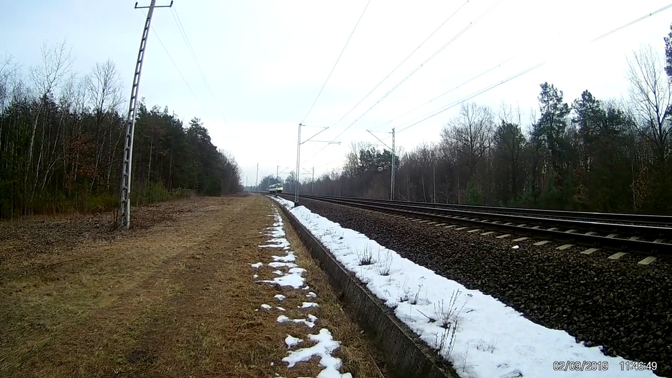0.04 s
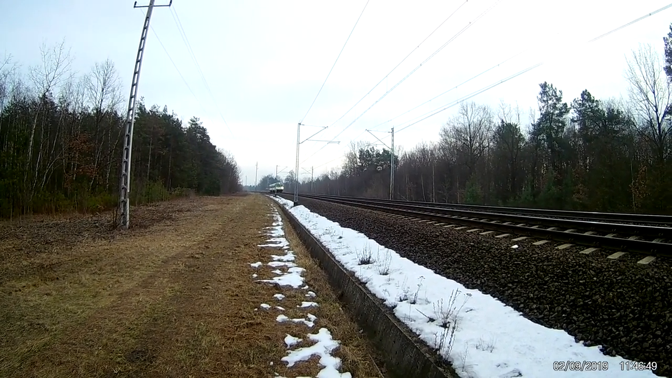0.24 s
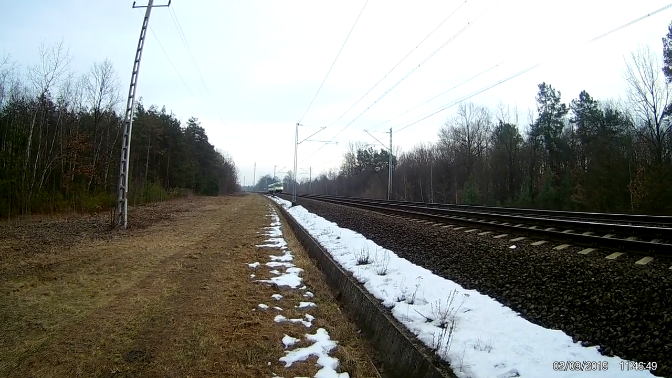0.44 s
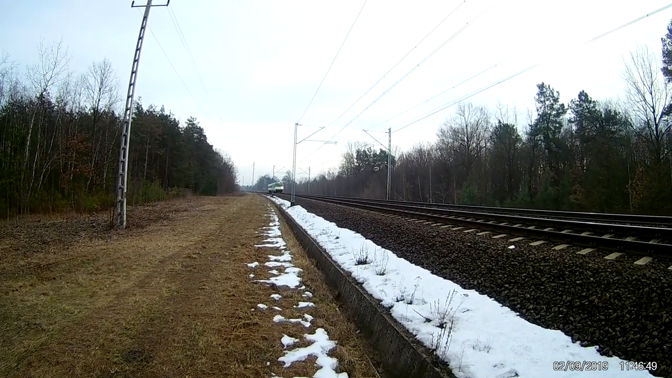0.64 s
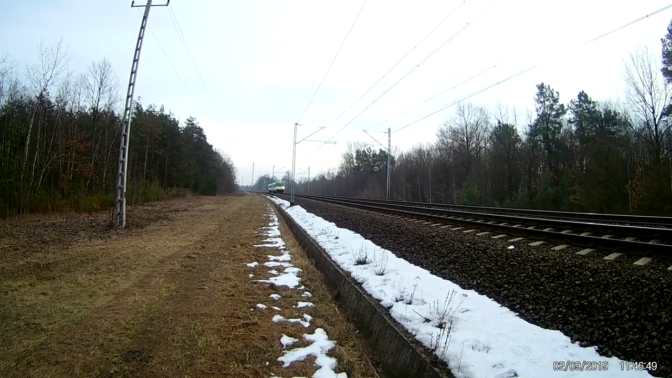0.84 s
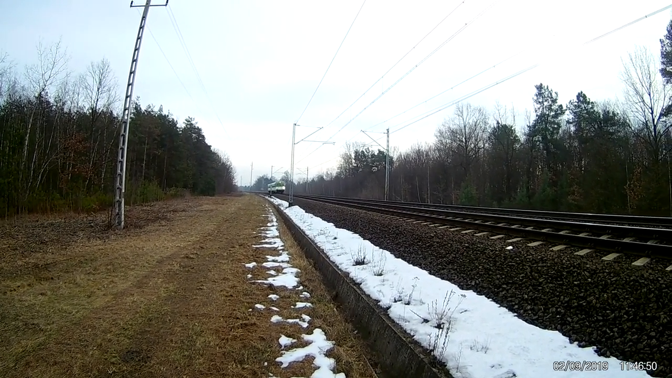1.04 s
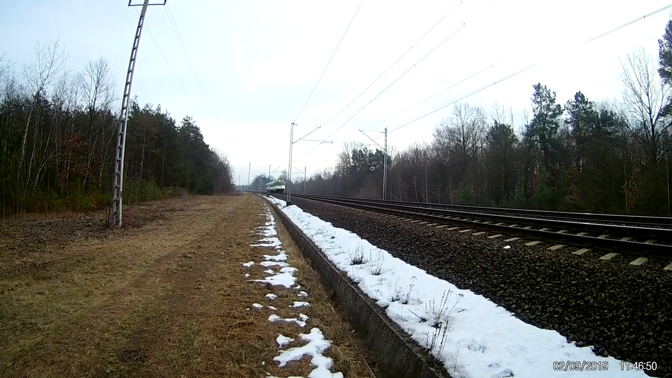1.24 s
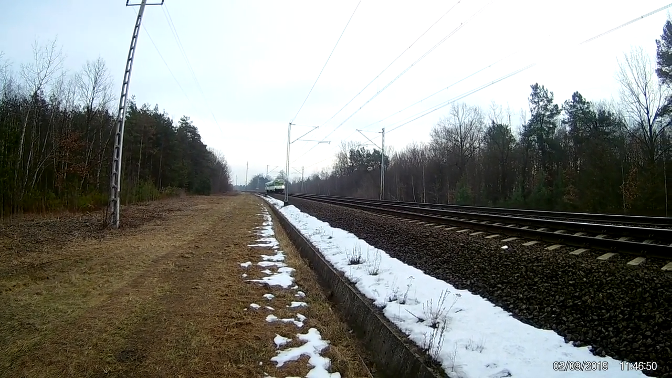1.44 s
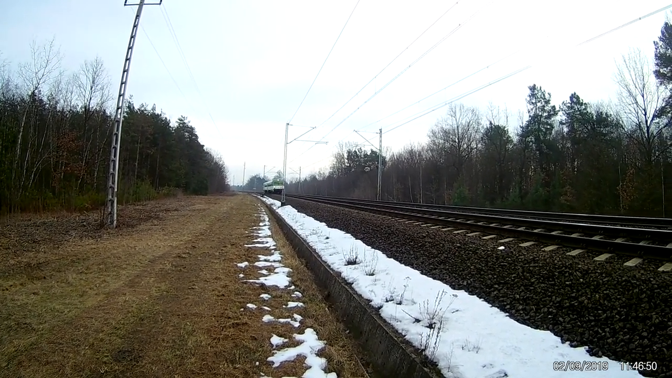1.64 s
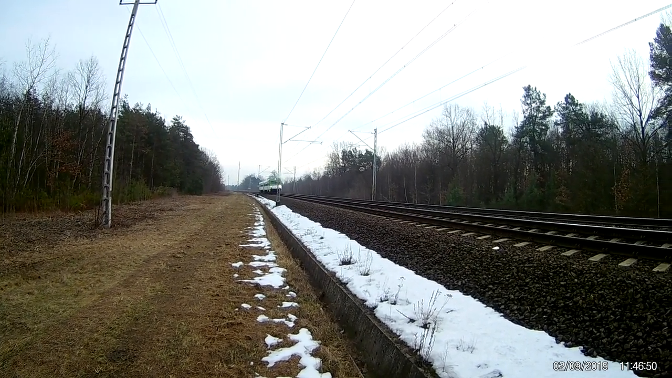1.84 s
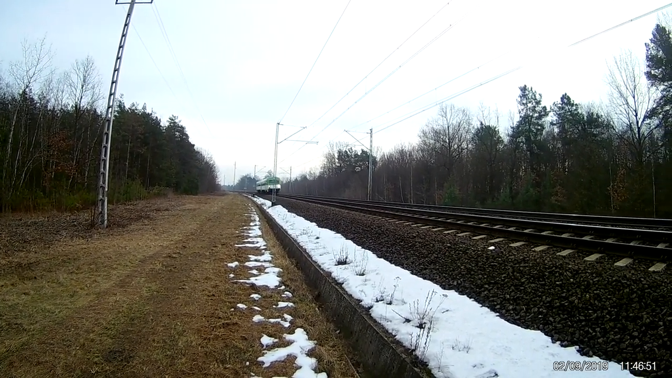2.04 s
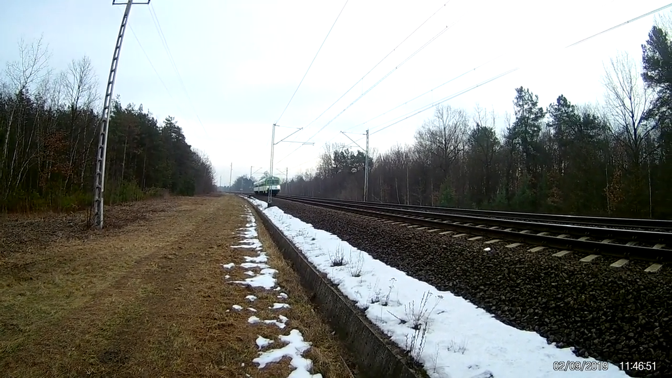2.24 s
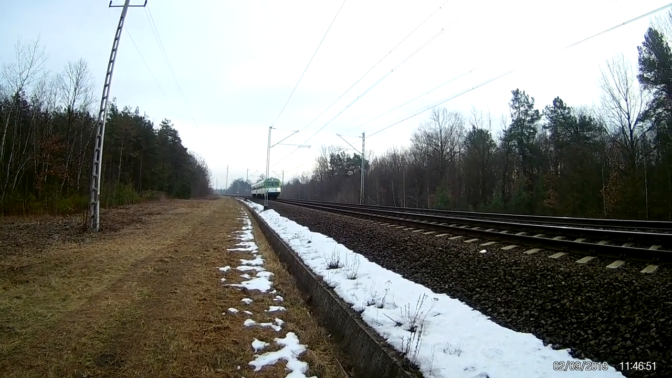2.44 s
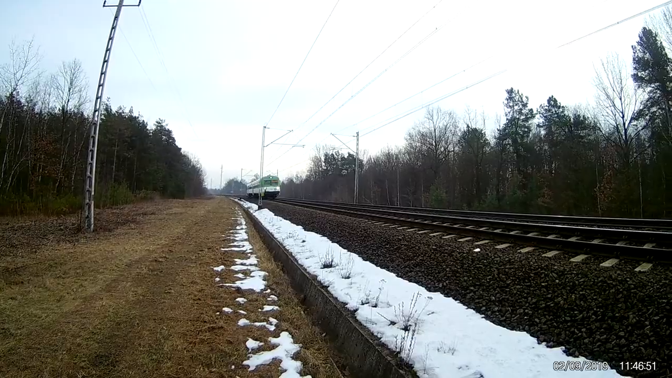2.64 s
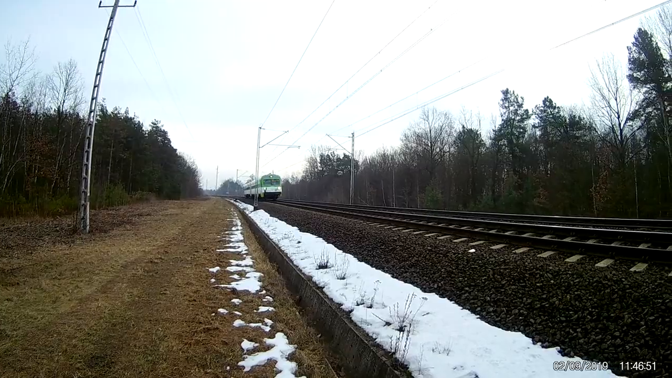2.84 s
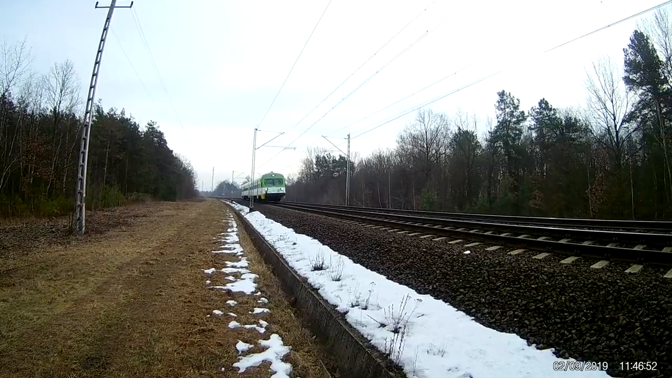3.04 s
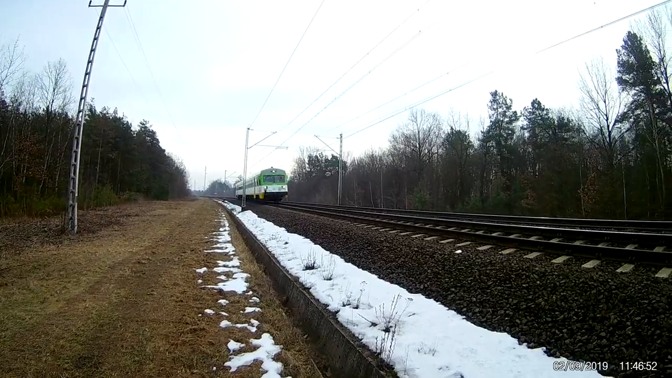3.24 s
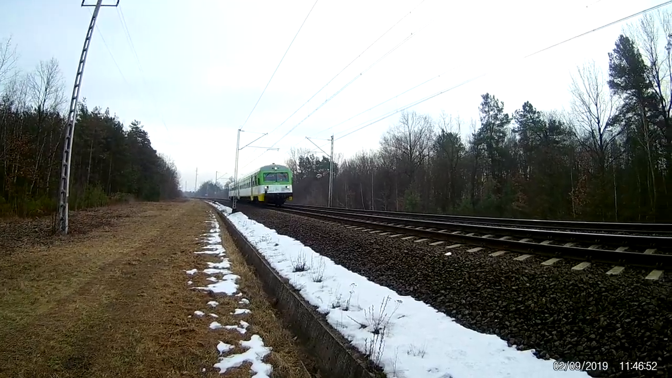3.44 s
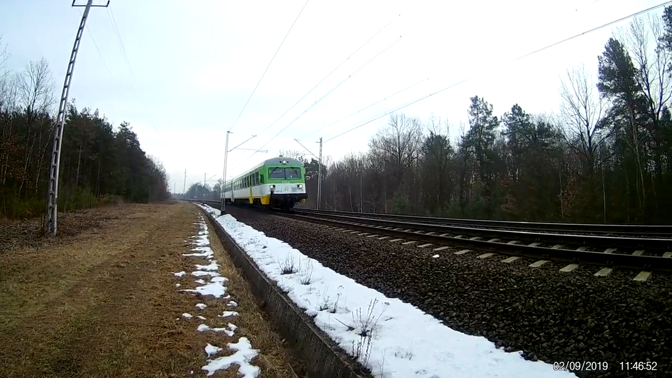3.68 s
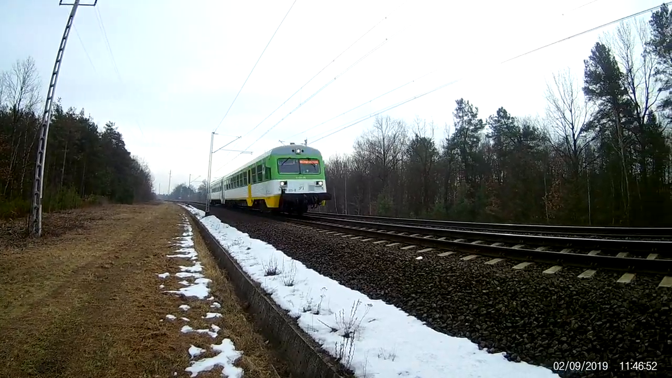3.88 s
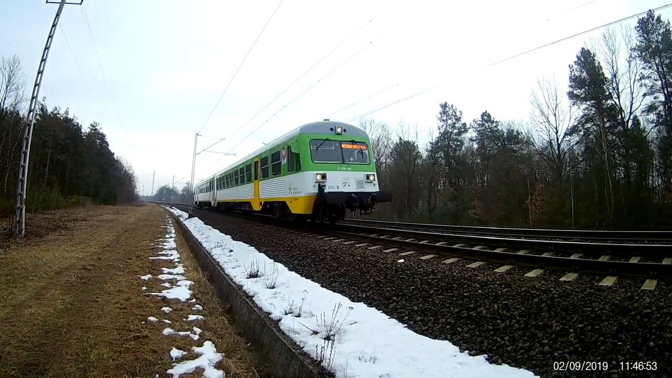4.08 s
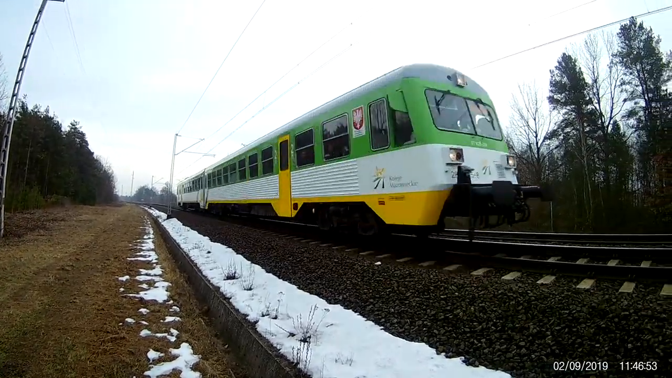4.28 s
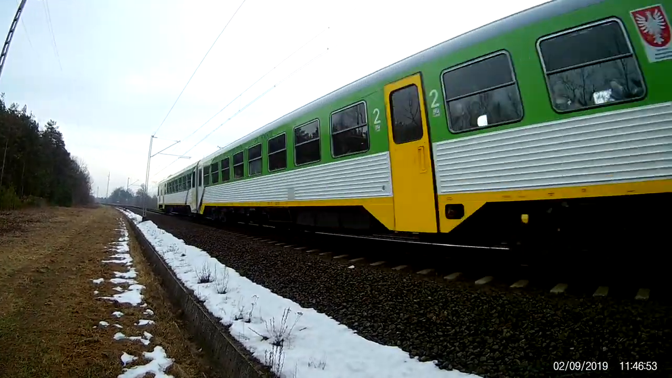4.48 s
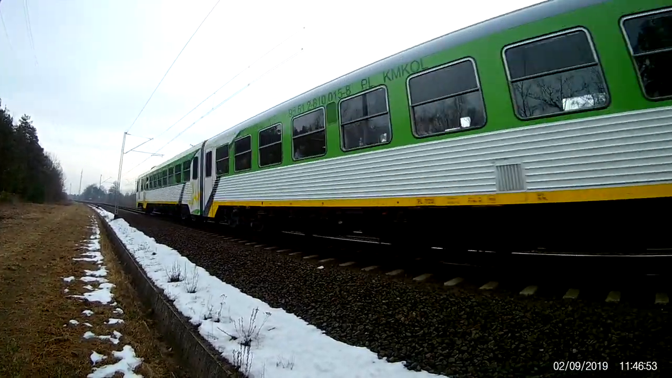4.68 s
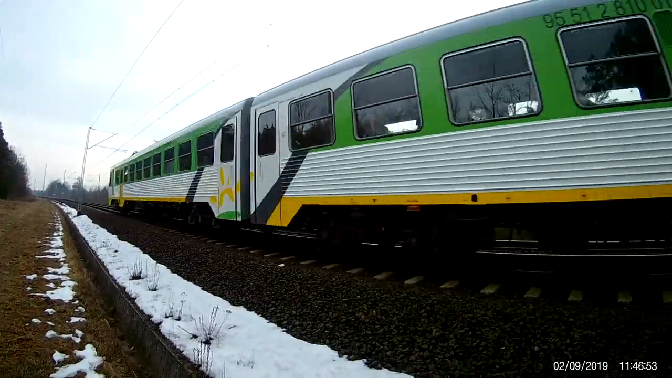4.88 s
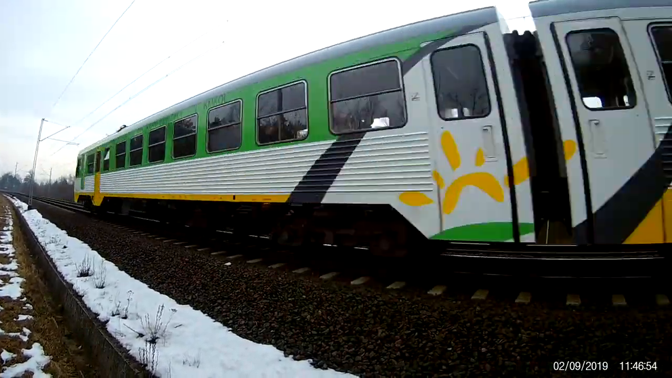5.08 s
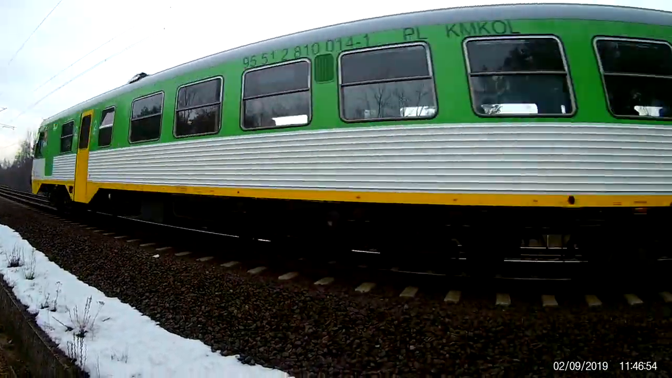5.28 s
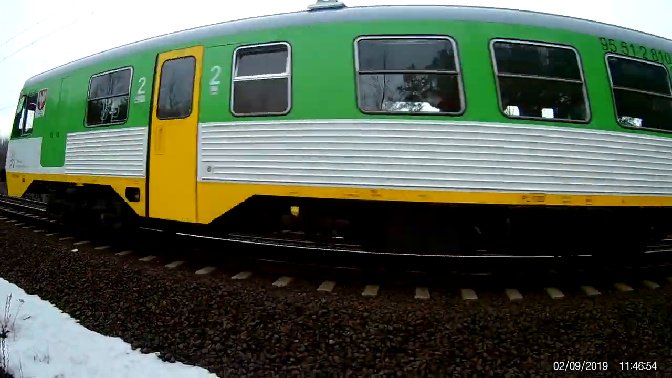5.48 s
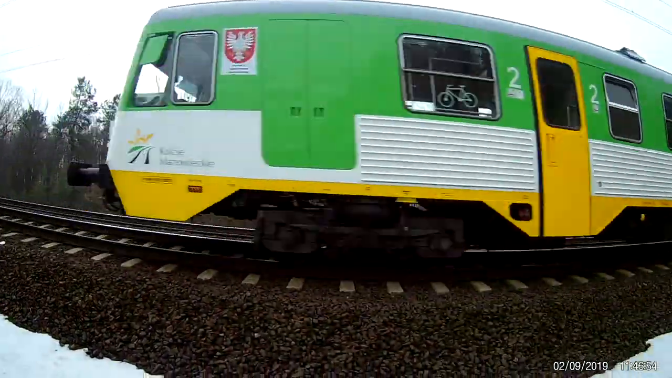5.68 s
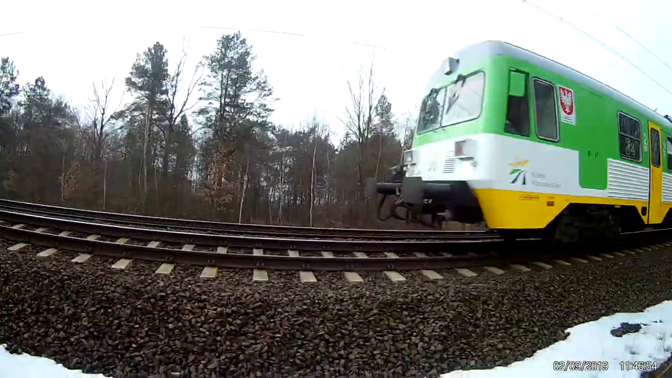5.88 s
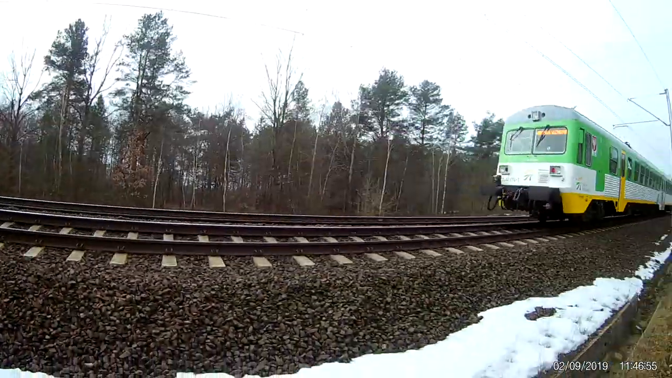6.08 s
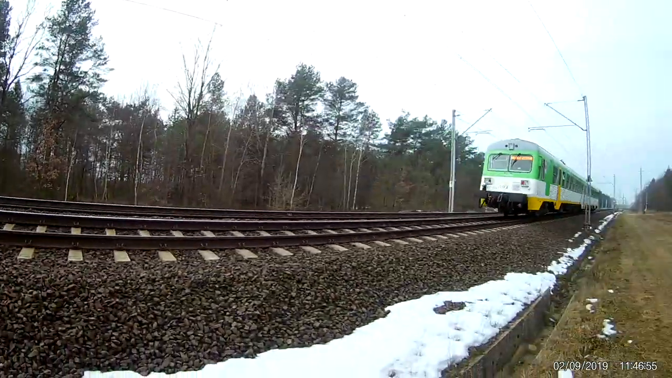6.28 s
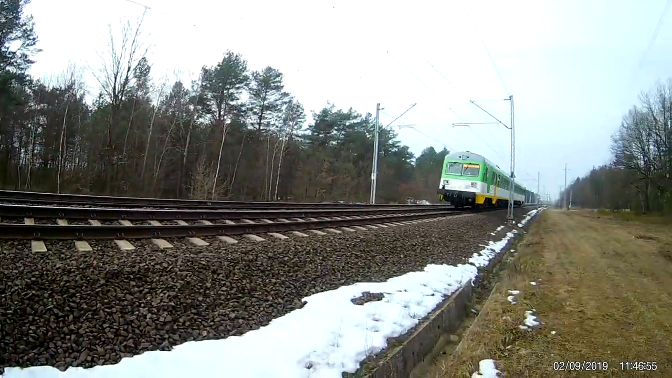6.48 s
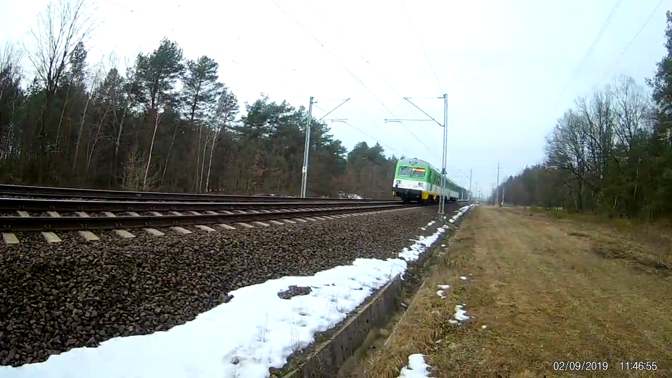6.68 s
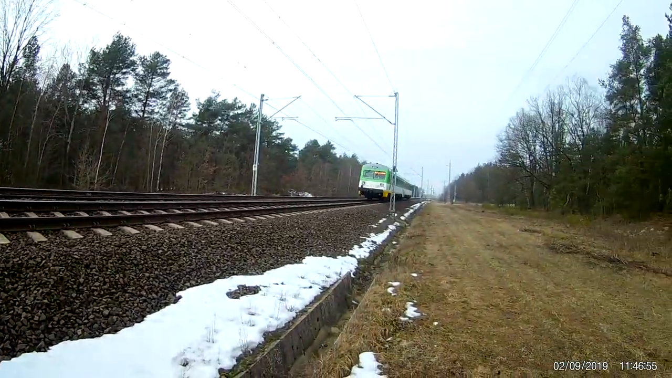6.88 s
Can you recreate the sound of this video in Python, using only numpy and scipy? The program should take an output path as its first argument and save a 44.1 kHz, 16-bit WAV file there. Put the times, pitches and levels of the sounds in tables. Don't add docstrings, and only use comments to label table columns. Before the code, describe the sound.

Outdoors by a forest railway, soft wind thumps bump a cheap microphone over faint murmur and hiss. A distant rolling rumble grows, wheels singing thinly, then a two-car diesel train bursts past a few metres away with a broad roar, engine drone and clattering valves, slightly overloading. The pitch drops as it passes, and the roar quickly fades with ringing wheels.

```python
import sys
import numpy as np
from scipy import signal
from scipy.io import wavfile
from scipy.ndimage import uniform_filter1d

SR = 44100
rng = np.random.default_rng(int(sys.argv[2]) if len(sys.argv) > 2 else 0)


def makeup_ratio(level_db):
    decades = np.asarray(level_db, float) / 20
    return 10 ** decades


def to_wav(sig):
    pcm = np.clip(np.atleast_2d(sig), -1, 1) * 32767
    pcm = np.round(pcm).astype(np.int16)
    wavfile.write(sys.argv[1], SR, pcm.T)


N = 305543

SPEED, SOUND = 31.5, 343.0
TRACK_M = 6.4
FRAME, HOP = 1024, 256


def evened(x):
    return x / np.sqrt(np.mean(x ** 2) + 1e-20)


def read(points, hz):
    f, value = np.transpose(points)
    return np.interp(np.log(hz + 1), np.log(f + 1), value, -150, -150)


def columns(rows, t):
    s, *values = np.transpose(rows)
    return [np.interp(t, s, v) for v in values]


def bump(x, at, spread, db):
    return db * np.exp(-((x - at) / spread) ** 2)


def peak(hz, centre_hz, width, db):
    return (makeup_ratio(db) ** 2 - 1) / (1 + (2 * (hz - centre_hz) / width) ** 2) ** 2


def passing(t, abreast):
    along = SPEED * (t - abreast)
    metres = np.hypot(along, TRACK_M)
    return metres, 1 / (1 + SPEED / SOUND * along / metres)


def spread_db(t, abreast):
    return 20 * np.log10(TRACK_M / passing(t, abreast)[0])


def beam(t, abreast):
    beam_m = 4
    return np.exp(-(SPEED * (t - abreast) / beam_m) ** 2)


def frame_grid():
    return np.arange(N // HOP + 5) * HOP / SR, np.fft.rfftfreq(FRAME, 1 / SR)[:, None]


def noise(db):
    a, b = rng.standard_normal((2,) + db.T.shape)
    spectrum = (a + 1j * b).T * makeup_ratio(db + 0.5)
    return signal.istft(spectrum, nperseg=FRAME, noverlap=FRAME - HOP)[1][:N]


def band_db(db, hz, lo_hz, hi_hz):
    inside = (hz > lo_hz) & (hz < hi_hz)
    return 10 * np.log10((makeup_ratio(db) ** 2 * inside).sum(0))


def patches(shape, bins, frames):
    z = rng.standard_normal(shape[::-1]).T
    z = uniform_filter1d(z, size=bins, axis=0)
    return evened(uniform_filter1d(z, size=frames, axis=1))


def bandpassed(x, order, lo_hz, hi_hz):
    return signal.sosfilt(signal.butter(order, [lo_hz, hi_hz], "band", fs=SR, output="sos"), x)


# (frequency [Hz], density [dB per Hz])
SELF_NOISE = [(3300, -21.5), (6200, -10.5), (6500, -6.5), (7100, -1), (7500, -15), (7700, -18),
              (12000, -16.5), (15600, -11.5)]


def recorder_hiss(floor_db=-79.5, duck_db=1.0, loud_db=-20.5):
    t, hz = frame_grid()
    loud = 0.5 + 0.5 * np.tanh((columns(ROAR_LEVEL, t)[0] - loud_db) / 8)
    field = read(SELF_NOISE, hz) + 0 * t
    level = floor_db - duck_db * loud
    return noise(field - band_db(field, hz, 7700, 15500) + level)


# (time [s], level [dB])
TICK_TIMES = [(4.8196, -28), (4.8569, -32), (4.7555, -40), (5.249, -38)]


def overload_ticks():
    out = np.zeros(N)
    for s, db in TICK_TIMES:
        out[round(s * SR)] = makeup_ratio(db)
    return signal.sosfilt(signal.butter(4, 8200, "high", fs=SR, output="sos"), out)


# (time [s], peak level [dB], swing frequency [Hz])
WIND_THUMPS = [(0.101, -33, 170), (0.18, -33, 170), (0.196, -31, 170), (0.267, -32, 170), (0.362, -33, 170),
               (0.427, -30.5, 170), (0.44, -40, 170), (0.584, -48, 170), (1.026, -33, 170),
               (1.102, -31, 170), (1.124, -35.5, 170)]


def wind_thumps(cycles=0.97, puff_db=-4, rustle=0.59):
    t, out = np.arange(N) / SR, np.zeros(N)
    air = evened(bandpassed(rng.standard_normal(N), 2, 70, 380))
    for s, db, hz in WIND_THUMPS:
        swings = np.clip((t - s) * hz, 0, 30)
        envelope = np.tanh(8 * swings) * np.exp(-swings / cycles)
        out += makeup_ratio(db) * envelope * (rustle * air - np.sin(2 * np.pi * swings + 1))
    return makeup_ratio(puff_db) * out


# (time [s], peak level [dB])
VALVE_BURSTS = [(4.6968, -22.5), (4.752, -21), (4.814, -24), (4.8744, -27), (4.932, -24.5)]


def valve_clatter(length=0.0064, ring_hz=4000, ring_db=-10, bright_db=-20):
    t, burst = np.arange(N) / SR, np.zeros(N)
    for s, db in VALVE_BURSTS:
        burst += makeup_ratio(db) * np.exp(-((t - s - length) / length) ** 2)
    air = rng.standard_normal(N)
    ring = bandpassed(air, 2, ring_hz * 0.94, ring_hz * 1.135)
    bright = bandpassed(air, 6, 4800, 7200)
    return burst * (makeup_ratio(ring_db) * evened(ring) + makeup_ratio(bright_db) * evened(bright))


SHADE_M = 16

# (frequency [Hz], density [dB per Hz])
FIZZ_COLOUR = [(7950, -26.5), (8150, -12.5), (8500, 0), (9300, -5), (10300, -1), (11500, -10.5),
               (12300, -13.5), (13400, -26), (14400, -15), (15500, -32)]
FIZZ_LEVELS = [
    -63,
    -60.5,
]


def exhaust_fizz(patchy_db=1.2, fall=1.3, wake_db=3.0):
    t, hz = frame_grid()
    field = read(FIZZ_COLOUR, hz) + patchy_db * patches((len(hz), len(t)), 30, 5)
    power = 0
    for db, (_, _, pipe), beams in zip(FIZZ_LEVELS, ENGINE_PASSES, EXHAUST_BEAMS):
        wake = wake_db * np.tanh(np.maximum(t - pipe, 0) * SPEED / SHADE_M)
        power = power + makeup_ratio(db + fall * spread_db(t, pipe) + beams[2] * beam(t, pipe) + wake) ** 2
    return noise(field - band_db(field, hz, 8300, 12500) + 10 * np.log10(power))


# (firing rate [Hz], time engine abreast [s], time exhaust abreast [s])
ENGINE_PASSES = [
    (102.07, 4.72, 4.8),
    (93.05, 5.52, 5.31),
]
# (level abreast [dB], shade ahead [dB], shade behind [dB])
FIRING_LEVELS = [(-20.5, -2, -1), (-28.5, -3, 3)]
# (half order [dB], its shade ahead [dB], upper orders [dB], their shade ahead [dB], behind [dB])
PIPE_LEVELS = [(-32.5, 2, -33., -4., -5.5), (-36, -3.5, -33., -12.5, -3.5)]
# (half order [dB], upper orders [dB], fizz [dB], hiss [dB], rumble [dB])
EXHAUST_BEAMS = [(3., 0.5, 5., 3.6, 0.5), (6.5, 8., 6., 3, 1.7)]
# (time [s], spread [s], level [dB])
GROUND_ECHOES = [
    [(5.14, 0.12, -19), (3.5, .6, 4.), (7.8, .2, -4.5)],
    [(6.3, .15, -4.5), (5.7, 0.28, -2), (4.4, 0.065, -5.5)],
]
# (multiple of the cycle, level [dB])
UPPER_ORDERS = [(9, 0), (12, -2), (15, -7), (18, -7), (22, -10)]
# (multiple of the cycle, level re firing [dB])
UNEVEN_CYLINDERS = [(2, -22), (4, -24), (5, -22), (7, -19), (8, -21), (11, -22)]


def engine(passes, levels, orders, beams, echoes, waver=0.14, pipe_waver=0.35, uneven_db=-4.5):
    t, s = frame_grid()[0], np.arange(N) / SR
    firing_hz, abreast, pipe = passes
    firing_db, ahead_db, behind_db = levels
    half_db, half_ahead_db, upper_db, *upper_shade_db = orders
    side = np.tanh(SPEED * (t - abreast) / SHADE_M)
    firing = firing_db + spread_db(t, abreast) + np.where(side < 0, ahead_db, behind_db) * side ** 2
    firing = firing + sum(bump(t, *row) for row in echoes)
    half = half_db + spread_db(t, pipe) + beams[0] * beam(t, pipe)
    half = half + half_ahead_db * np.minimum(side, 0) ** 2
    upper = upper_db + spread_db(t, pipe) + beams[1] * beam(t, pipe)
    upper = upper + np.where(side < 0, *upper_shade_db) * side ** 2
    cycle = 2 * np.pi * np.cumsum(firing_hz / 6 * passing(s, abreast)[1]) / SR
    lines = [(6, firing), (3, half)]
    lines += [(k, db + upper) for k, db in UPPER_ORDERS]
    lines += [(k, db + firing + uneven_db) for k, db in UNEVEN_CYLINDERS]
    out = 0
    for k, db in lines:
        drift = np.interp(t, np.arange(80) / 10, rng.standard_normal(80))
        gain = makeup_ratio(db) * (1 + drift * (waver if k == 6 else pipe_waver))
        out = out + np.interp(s, t, gain) * np.cos(k * cycle + 2 * np.pi * rng.random())
    return np.sqrt(2) * out


# (time loudest [s], spread [s], pitch at rest [Hz], level [dB], time abreast [s])
WHEEL_TONES = [(6.4, .6, 2030, -40, 5.66), (5.6, .2, 2080, -34.5, 5.2), (5.94, 0.3, 1500, -29.5, 5.8),
               (3.55, .25, 3700, -64.5, 4.3), (3.7, .7, 790, -43.5, 4.9), (3.6, .8, 914, -43.5, 4.9),
               (6.6, .4, 848, -38.5, 5.66), (5.15, .25, 352, -32.5, 5.27), (3.05, .4, 1075, -46, 4.45)]


def wheel_whines(wander_hz=20.7, flutter=0.4):
    t, out = np.arange(N) / SR, 0
    for s, spread, rest_hz, db, abreast in WHEEL_TONES:
        a, b = (np.interp(t, np.arange(360) / 50, z) for z in rng.standard_normal((2, 360)))
        wander = wander_hz * a * min(rest_hz / 900, 1)
        turns = np.cumsum(rest_hz * passing(t, abreast)[1] + wander) / SR
        swell = np.exp(-((t - s) / spread) ** 2) * (1 + flutter * b)
        out = out + makeup_ratio(db) * swell * np.sin(2 * np.pi * turns)
    return np.sqrt(2) * out


# (time loudest [s], spread [s], pitch at rest [Hz], over roar [dB], time abreast [s])
SINGING_WHEELS = [(6.57, 0.54, 2030, 7, 5.66), (3.8, 0.065, 2380, 1.5, 2.3), (7.2, 0.18, 1600, 8, 4.5),
                  (6, .15, 1900, 3.5, 5.5), (5.9, .25, 1500, 0, 4), (6.66, 0.45, 930, 8, 6.8),
                  (6.37, 0.26, 540, 5.5, 6.2), (1.6, 1, 1200, 8, 4.45), (1.54, 0.33, 2790, 11.5, 4.45),
                  (3.55, .22, 3700, 3.5, 5.3), (3.1, 0.37, 870, 2.5, 4.9), (3.05, .4, 1110, 5, 4)]
# (time loudest [s], spread [s], pitch at rest [Hz], over roar [dB], time abreast [s])
SIZZLING_WHEELS = [
    (3, .9, 6250, 7, 4.45),
    (6.6, .45, 7450, 7.6, 5.66),
]
# (time abreast [s], spread [s], pitch at rest [Hz], width [Hz], over roar [dB])
PASSING_SURGES = [(4.5, .09, 600, 150, 5.5), (5.1, 0.14, 656, 170, 5), (5.7, 0.083, 674, 160, 8),
                  (5.3, .2, 390, 28, 7), (5.72, 0.085, 263, 30, 8), (4.44, 0.13, 4030, 580, 7.5),
                  (5.36, .06, 6500, 400, 4.5), (4.33, .12, 5200, 700, -5), (5.36, .09, 870, 200, -4),
                  (4.14, .12, 540, 150, 1)]


def singing_db(t, hz, sing_width=91, sizzle_width=640):
    rows = [(s, spread, f, sing_width, db, abreast) for s, spread, f, db, abreast in SINGING_WHEELS]
    rows += [(s, spread, f, sizzle_width, db, abreast) for s, spread, f, db, abreast in SIZZLING_WHEELS]
    rows += [(*row, row[0]) for row in PASSING_SURGES]
    extra = 0
    for s, spread, f, width, db, abreast in rows:
        at_rest_hz = hz / passing(t, abreast)[1]
        extra = extra + np.exp(-((t - s) / spread) ** 2) * peak(at_rest_hz, f, width, db)
    return 10 * np.log10(np.maximum(1 + extra, 0.1))


# (time abreast [s], level [dB], column of the resonances)
BOGIE_PASSES = [
    (4.45, 0, 0),
    (4.95, 0, 1),
    (5.22, 0, 1),
    (5.66, 0, 2),
]
# (frequency [Hz], width [Hz], front, middle, rear bogies over the roar [dB])
WHEEL_RINGS = [(551, 110, 2.5, 4.5, 4.6), (646, 88, 3, 2.5, 0.96), (880, 187, 5, -1, 3.8),
               (1212, 100, 3.5, 1.4, 0.81), (1477, 100, -2.5, 1.5, 4.8), (2053, 71, 4.5, 2.5, 7.7),
               (2770, 180, 4.5, 2.5, .6), (3720, 120, 5.5, 2.5, .7), (4800, 80, 8.5, -2.5, .4),
               (5100, 100, 8.5, 1, .3), (6250, 300, 3.5, -3.5, 4.1)]
# (frequency [Hz], density [dB per Hz])
ROAR_COLOUR = [(20, -22), (40, -12), (75, -10.5), (130, -8.5), (300, -11), (450, -5), (680, -2), (1120, -1),
               (1270, -6), (1500, -4), (1700, -9), (2150, -11), (2450, -20), (3000, -21)]
# (frequency [Hz], density [dB per Hz])
HISS_COLOUR = [(3000, -24.5), (3300, -32), (3950, -30), (4700, -34.5), (6000, -39), (7000, -47.5),
               (7500, -54), (7800, -67), (7950, -75.5)]
# (frequency [Hz], width [Hz], level [dB])
NEAR_RAIL = (1510, 27, 5.4)


def rolling_colour(t, hz, nearest, shadow_m=1.6, patchy_db=1.45):
    power, total = 0, 0
    for abreast, db, column in BOGIE_PASSES:
        metres, pitch = passing(t, abreast)
        hidden = 0.5 ** ((metres - nearest) / shadow_m)
        weight = makeup_ratio(db) ** 2 / metres ** 2 * hidden
        rings = sum(peak(hz / pitch, f, width, dbs[column]) for f, width, *dbs in WHEEL_RINGS)
        power = power + weight * np.maximum(1 + rings, 0.06)
        total = total + weight
    field = np.maximum(read(ROAR_COLOUR, hz), read(HISS_COLOUR, hz)) + 10 * np.log10(power / total)
    alongside = (TRACK_M / nearest) ** 2
    field = field + 10 * np.log10(1 + alongside * peak(hz, *NEAR_RAIL))
    return field + patchy_db * patches(field.shape, 4, 20) + singing_db(t, hz)


# (time [s], level [dB])
ROAR_LEVEL = [(0, -46.5), (.6, -44.5), (1.5, -41.5), (2.4, -37), (3.0, -34), (3.65, -27.5), (3.8, -27.5),
              (4.0, -23), (4.18, -20), (4.33, -12.5), (4.6, -12), (4.85, -10.5), (5.45, -10.5), (5.78, -12),
              (6.0, -17), (6.22, -24), (6.55, -26.5), (6.93, -30)]
# (time [s], spread [s], level [dB])
RAIL_RUMBLE = [
    (3.95, .35, 4.5),
    (6.8, 0.46, -1.5),
]
# (time [s], spread [s], level [dB])
FOREST_LULL = (0.83, 0.2, -5.)
# (distance [m], spread [m], level [dB])
SKIRT_SHADE = (15, 2.5, -2.5)
WHEEL_FLATS = [0.067, 0.062, 0.027, 0.076]


def rolling(far_bass_db=12.5, far_m=30.0, behind=0.52, wheel_hz=13.1):
    rumble_db, ground_db, ground_m, forest_db = -17.0, -4, 35.0, -62.5
    hiss_db, air_db_per_m = -25.5, 0.0837
    t, hz = frame_grid()
    nearest = np.min([passing(t, bogie[0])[0] for bogie in BOGIE_PASSES], axis=0)
    field = rolling_colour(t, hz, nearest)

    roar, = columns(ROAR_LEVEL, t)
    hiss_beam, rumble_beam = sum(np.outer(beams[3:], beam(t, e[2]))
                                 for e, beams in zip(ENGINE_PASSES, EXHAUST_BEAMS))
    rumble = roar + rumble_db + ground_db * np.tanh((nearest / ground_m) ** 2) + rumble_beam
    rumble = rumble + sum(bump(t, *row) for row in RAIL_RUMBLE)
    forest = forest_db + bump(t, *FOREST_LULL)
    rumble = 10 * np.log10(makeup_ratio(rumble) ** 2 + makeup_ratio(forest) ** 2)
    hiss = roar + hiss_db - air_db_per_m * nearest + hiss_beam + bump(nearest, *SKIRT_SHADE)

    roar = roar - band_db(field, hz, 400, 2400)
    rumble = rumble - band_db(field, hz, 240, 400)
    hiss = hiss - band_db(field, hz, 3300, 6300)
    low = np.clip(np.log(530 / (hz + 1)) / 0.41, 0, 1)
    high = np.clip(np.log((hz + 1) / 2900) / 0.27, 0, 1)
    deep = np.clip(np.log(230 / (hz + 1)) / 1.1, 0, 1)
    far = np.tanh(nearest / far_m) * np.where(t > BOGIE_PASSES[1][0], behind, 1)
    field = field + roar + low * (rumble - roar) + high * (hiss - roar) + far_bass_db * far * deep

    s = np.arange(N) / SR
    turns = np.cumsum(wheel_hz * passing(s, 4.9)[1]) / SR
    throb = 0
    for k, depth in enumerate(WHEEL_FLATS):
        throb = throb + depth * np.cos(2 * np.pi * ((k + 1) * turns + rng.random()))
    return noise(field) * (1 + throb)


def scene():
    microphone = recorder_hiss() + overload_ticks() + wind_thumps()
    train = valve_clatter() + exhaust_fizz()
    for settings in zip(ENGINE_PASSES, FIRING_LEVELS, PIPE_LEVELS, EXHAUST_BEAMS, GROUND_ECHOES):
        train = train + engine(*settings)
    train = train + wheel_whines() + rolling()
    return (microphone + train)[None]


def top_cut(x):
    return signal.sosfilt(signal.butter(12, 15750, fs=SR, output="sos"), x)


def record(dry):
    knee = 0.8
    over = np.maximum(abs(dry) - knee, 0)
    shaved = np.sign(dry) * (over - (1 - knee) * np.tanh(over / (1 - knee)))
    shaved = signal.sosfiltfilt(signal.butter(6, 6500, fs=SR, output="sos"), shaved)
    return top_cut(np.clip(dry - shaved, -1, 1))


dry = scene()
out = record(dry)
to_wav(out)
```